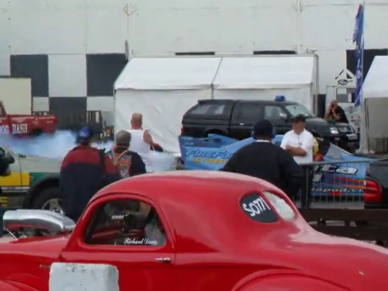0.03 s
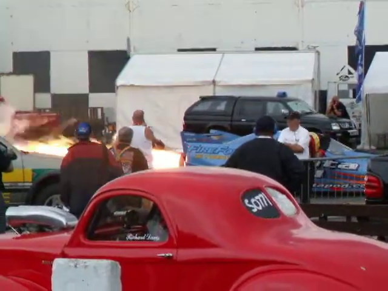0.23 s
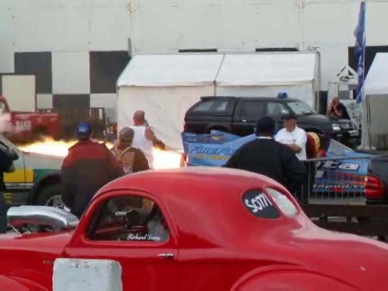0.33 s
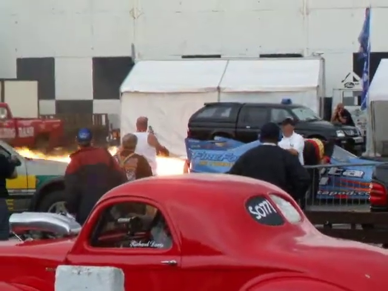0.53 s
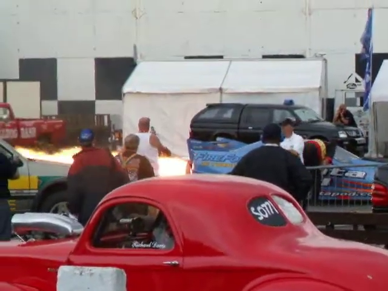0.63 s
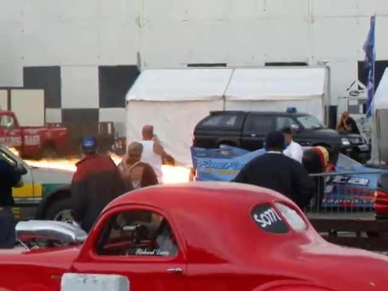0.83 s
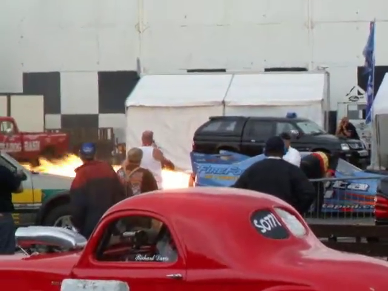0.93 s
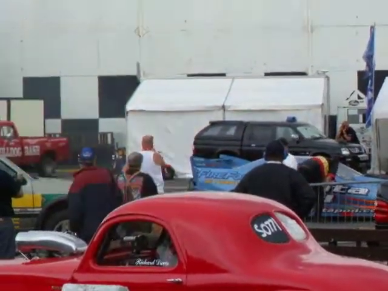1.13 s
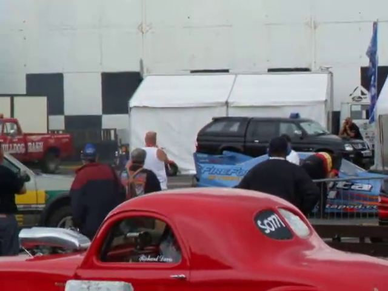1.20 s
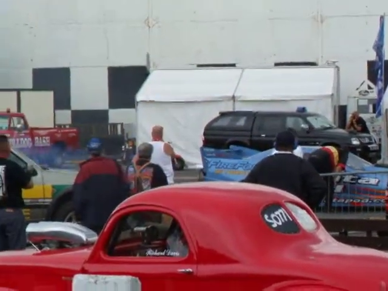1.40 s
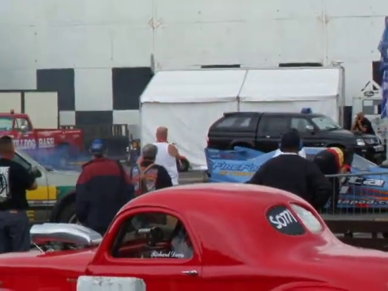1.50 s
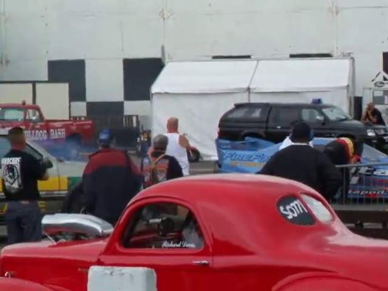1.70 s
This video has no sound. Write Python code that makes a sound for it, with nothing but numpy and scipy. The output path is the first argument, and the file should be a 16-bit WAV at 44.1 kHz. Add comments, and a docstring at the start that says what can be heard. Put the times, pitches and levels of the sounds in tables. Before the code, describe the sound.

A jet car's turbine hisses with a thin high whine at an outdoor track. Its afterburner lights with a crack and deep, sputtering booms that overload the microphone, roars for about a second, then dies as the whine grows.

```python
"""A jet car's turbine hisses, rumbles and whines at a race track. After a fifth of a second its
afterburner lights with a crack and a deep boom, then puffs and sputters as more gulps of fuel ignite.
The booms overload a limiter, which ducks everything for a moment. The turbulent flame roars for
about a second and goes out while the turbine spools up, its blade tones rising and growing louder."""
import sys
import numpy as np
from scipy import signal
from scipy.fft import rfft, irfft, next_fast_len
from scipy.io import wavfile
from scipy.ndimage import minimum_filter1d, map_coordinates

SR = 44100
rng = np.random.default_rng(int(sys.argv[2]) if len(sys.argv) > 2 else 0)


def unload_audio(sound):
    """Save the sound as a 16-bit wav file, at the path given as the first command line argument."""
    columns = np.transpose(np.atleast_2d(sound))
    # keep every value between -1 and 1, then stretch to whole-number steps
    steps = np.round(np.clip(columns, -1, 1) * 32767)
    wavfile.write(sys.argv[1], SR, steps.astype(np.int16))


N = 77175


def amp(db):
    """Amplitude ratio of a level: a factor of ten for every 20 dB."""
    return 10 ** (np.asarray(db) / 20)


def unit(x):
    """Normalisation to an rms of 1."""
    return x / np.sqrt(np.mean(x ** 2) + 1e-20)


def curve(rows):
    """Linear interpolation of (time_s, value) rows to one value per sample."""
    return np.interp(np.arange(N) / SR, *np.transpose(rows))


def wobble(rate_hz):
    """Smooth random modulation: a spline through rate_hz Gaussian values a second."""
    knots = rng.standard_normal(2048)
    return map_coordinates(knots, [np.arange(N) * rate_hz / SR], mode="wrap")


def filtered(x, response):
    """Linear filtering: the spectrum is multiplied by a frequency response."""
    size = next_fast_len(N + SR // 2)
    hz = np.fft.rfftfreq(size, 1 / SR)
    return irfft(rfft(x, size) * response(hz), size)[:N]


def coloured(x, colour):
    """Spectral shaping by (frequency_hz, gain_db) rows, joined on a logarithmic frequency axis."""
    frequency_hz, gain_db = np.transpose(colour)
    return filtered(x, lambda hz: amp(np.interp(np.log(hz + 1), np.log(frequency_hz + 1), gain_db)))


def noise(colour):
    """Spectrally shaped Gaussian noise of rms 1."""
    return unit(coloured(rng.standard_normal(N), colour))


def since(start_s):
    """Seconds elapsed since an onset, zero before it."""
    return np.maximum(np.arange(N) / SR - start_s, 0)


def turbine():
    """Flow noise: the air stream radiates a broadband hiss over the low rumble of the exhaust."""
    # envelopes of the air stream and the exhaust: time_s, level_db
    hiss_levels = [(0, -42), (.22, -39), (.45, -42.5), (.75, -39.5), (1.12, -35.5), (1.3, -37),
                   (1.45, -34.5), (1.6, -32), (1.75, -29.5)]
    rumble_levels = [(0, -27.5), (.14, -37), (.7, -33), (1.4, -28.5), (1.55, -32.5), (1.75, -30)]
    # their spectra: frequency_hz, gain_db
    hiss_colour = [(100, 1.5), (170, 7.5), (250, -0.5), (400, -2), (600, 1.5), (900, -2.5), (1300, -3.5),
                   (1700, 1), (2200, -6), (3300, -3.5), (4500, -4.5), (6300, -1.5), (7300, -4.5),
                   (8200, -5)]
    rumble_colour = [(15, -7), (35, -7), (65, 2), (110, -12.5), (170, -12), (260, -27.5), (500, -39.5),
                     (1500, -63)]
    hiss = noise(hiss_colour) * amp(curve(hiss_levels) + 0.3 * wobble(rate_hz=33))
    rumble = noise(rumble_colour) * amp(curve(rumble_levels))
    return hiss + rumble


def whine():
    """Blade tones about an octave apart follow the shaft; turbulence modulates them into sidebands."""
    # compressor speed, as the pitch of which both tones are multiples: time_s, pitch_hz
    spool = [(0, 6352), (.22, 6392), (.5, 6272), (.8, 6188), (1.05, 6158), (1.25, 6134), (1.34, 6168),
             (1.5, 6255), (1.75, 6338)]
    # envelopes of the upper and lower tone: time_s, level_db
    upper_levels = [(0, -52.5), (.14, -46.5), (0.219, -48.5), (.27, -58), (.44, -60.5), (.52, -51.5),
                    (.79, -45), (.87, -71), (1.0, -54), (1.12, -53), (1.28, -47.5), (1.31, -52),
                    (1.36, -47.5), (1.459, -42.5), (1.56, -51), (1.63, -41), (1.75, -33)]
    lower_levels = [(0, -57.5), (0.221, -56.5), (.5, -63), (.95, -49.5), (1.03, -56), (1.13, -47),
                    (1.27, -48), (1.35, -54.5), (1.47, -51), (1.51, -42), (1.57, -47), (1.65, -61),
                    (1.75, -48)]
    jitter_hz, sideband_db, flutter_db = 7.1, -14.5, 2.5
    pitch_hz = curve(spool) + jitter_hz * wobble(rate_hz=60)
    phase = 2 * np.pi * np.cumsum(pitch_hz) / SR
    out = np.zeros(N)
    for multiple, levels in ((0.99, upper_levels), (.5, lower_levels)):
        sidebands = amp(sideband_db) * (wobble(rate_hz=160.2) + 1j * wobble(rate_hz=160.2))
        tone = np.real((1 + sidebands) * np.exp(1j * multiple * phase))
        flutter = amp(flutter_db * wobble(rate_hz=34.94))
        out += unit(tone * flutter) * amp(curve(levels))
    return out


def sputter():
    """Unsteady combustion: uneven burning radiates dull noise while the flame takes hold."""
    # envelope of the uneven burning: time_s, level_db
    levels = [(.22, -73), (.25, -16.5), (.28, -18), (.33, -18.5), (.39, -20), (.46, -24.5), (.51, -27.5),
              (.62, -47.5), (.8, -60)]
    # its spectrum: frequency_hz, gain_db
    colour = [(20, -3.5), (70, 6.5), (130, 6.5), (200, -8), (320, -12), (600, -22.5), (1500, -43.5),
              (4000, -70.5)]
    return noise(colour) * amp(curve(levels))


def flame():
    """Combustion roar: the afterburner's low turbulence modulates the amplitude of its upper band."""
    # envelope of the roar: time_s, level_db
    levels = [(.22, -34.5), (.26, -21.5), (.45, -30), (.55, -24.5), (.66, -21.5), (.9, -19.5), (1.08, -20),
              (1.16, -16.5), (1.27, -23), (1.34, -22), (1.43, -31.5), (1.52, -43), (1.75, -61)]
    # its spectrum: frequency_hz, gain_db
    colour = [(15, 0), (30, 4), (70, 1.5), (105, 2), (150, 0), (220, -7.5), (300, -14.5), (380, -17.5),
              (580, -16.5), (850, -23), (1200, -26.5), (2200, -34.5), (4500, -37), (8000, -52.5)]
    crossover_hz, surge_depth = 400, .25
    roar = noise(colour)
    low = filtered(roar, lambda hz: 1 / (1 + (hz / crossover_hz) ** 6))
    high = roar - low
    surge = unit(np.exp(surge_depth * unit(low)))
    return (low + high * surge) * amp(curve(levels))


def cracks():
    """Broadband transients: bright noise bursts decay exponentially as the flame front catches."""
    # catches of the flame front: start_s, level_db, rise_s, t60_s
    bursts = [(0.2207, -36.5, 0.0011, .05), (0.2298, -25.5, 0.00025, 0.011), (0.319, -24.5, 0.013, 0.088)]
    # their spectrum: frequency_hz, gain_db
    colour = [(60, 1), (300, 7.5), (600, 5.5), (930, 2), (1300, -2.5), (1900, -9), (4000, -3.5),
              (8000, -11)]
    envelope = np.zeros(N)
    for start_s, level_db, rise_s, t60_s in bursts:
        age_s = since(start_s)
        envelope += amp(level_db - 60 * age_s / t60_s) * (1 - np.exp(-age_s / rise_s))
    return envelope * noise(colour)


def shock_front(arrival_s):
    """Shock wave: a steep jump of pressure that relaxes exponentially."""
    rise_s, decay_s = .0005, .0011
    age_s = since(arrival_s)
    return np.exp(-age_s / decay_s) * (1 - np.exp(-age_s / rise_s))


def shock():
    """Ground reflection: the ignition's shock arrives directly, then again by a longer path."""
    arrival_s, gain_db = .2286, -4.5
    ground_delay_s, ground_gain_db = .0016, 1.5
    direct = shock_front(arrival_s)
    reflected = amp(ground_gain_db) * shock_front(arrival_s + ground_delay_s)
    return -amp(gain_db) * (direct + reflected)


def booms():
    """Damped oscillation: each gulp of fuel ignites as a deep swing of pressure that swells and dies."""
    # pressure waves: start_s, envelope_peak_db, pitch_hz, rise_cycles, polarity (push +1, pull -1)
    ignitions = [ (.2225, -10, 72, .3, -1), (.2284, 8, 42, .5, -1), (0.283, -3, 16, 0.086, 1),
                 (0.3394, 3.5, 28, 0.16, 1), (0.3733, 5, 35, 1.3, 1), (0.471, -10.5, 14.5, 0.1, 1)]
    damping_nepers_per_cycle = 3.32
    out = np.zeros(N)
    for start_s, envelope_peak_db, pitch_hz, rise_cycles, polarity in ignitions:
        cycles = since(start_s) * pitch_hz
        progress = cycles / rise_cycles  # 1 at the envelope's peak
        envelope = (progress * np.exp(1 - progress)) ** (damping_nepers_per_cycle * rise_cycles)
        out += polarity * amp(envelope_peak_db) * envelope * np.sin(2 * np.pi * cycles)
    return out


def scene():
    """Superposition: the pressures of turbine and afterburner add in one channel."""
    return (turbine() + whine() + flame() + sputter() + booms() + shock() + cracks())[None]


def limiter(x):
    """Automatic gain control: the gain drops fast on overload, holds, then recovers at a steady rate."""
    threshold_db, attack_s, hold_s, release_db_per_s = -4.5, .0025, 0.033, 107.5
    over_db = np.maximum(20 * np.log10(np.abs(x) + 1e-9) - threshold_db, 0)
    half_hold = int(hold_s * SR / 2)
    held_db = -minimum_filter1d(-over_db, 2 * half_hold + 1, origin=half_hold)  # trailing maximum
    release_db = release_db_per_s * since(0)
    duck_db = np.maximum.accumulate(held_db + release_db) - release_db
    pole = np.exp(-1 / (attack_s * SR))
    smoothed_db = signal.lfilter([1 - pole], [1, -pole], duck_db)
    return x * amp(-smoothed_db)


def record(dry):
    """Band limiting and saturation: the treble rolls off, and peaks are limited, then cut flat."""
    # treble response of the microphone: frequency_hz, gain_db
    microphone = [(6800, -0.5), (7600, -1), (8200, -8), (8700, -23), (9000, -34.5)]
    ceiling, cutoff_hz = .705, 9000
    limited = limiter(coloured(dry[0], microphone))
    saturated = np.clip(limited, -ceiling, ceiling)
    return filtered(saturated, lambda hz: hz < cutoff_hz)[None]


dry = scene()
out = record(dry)
unload_audio(out)
```